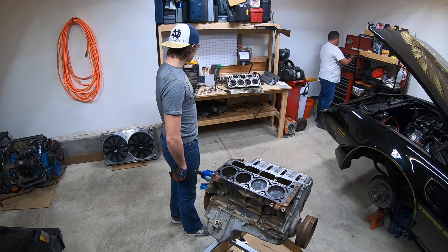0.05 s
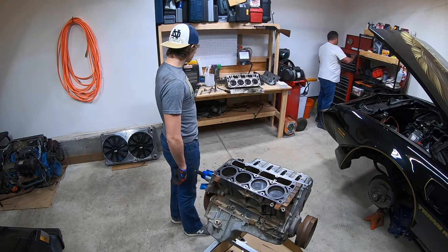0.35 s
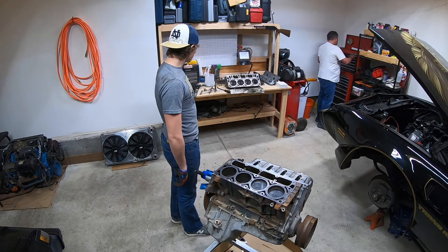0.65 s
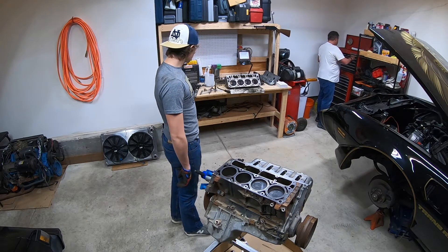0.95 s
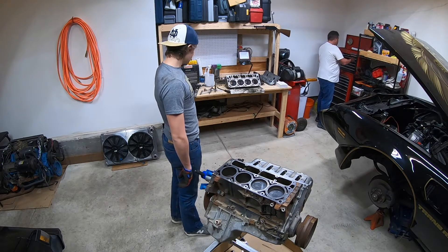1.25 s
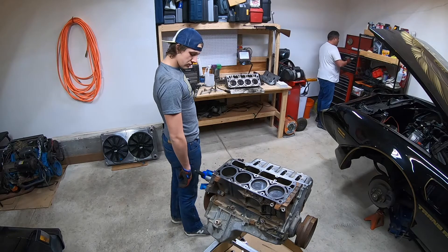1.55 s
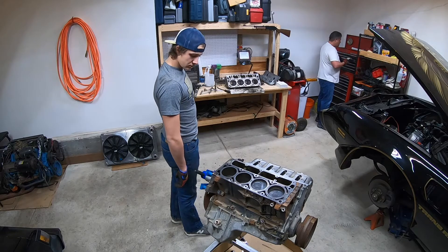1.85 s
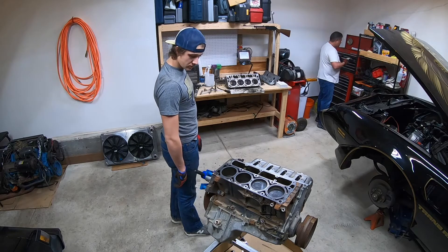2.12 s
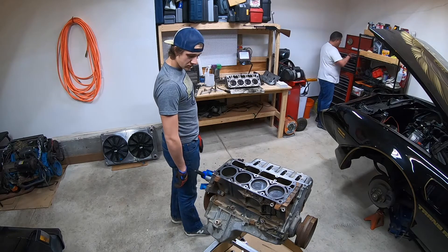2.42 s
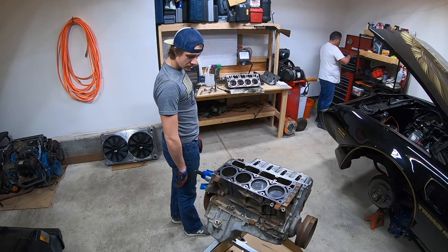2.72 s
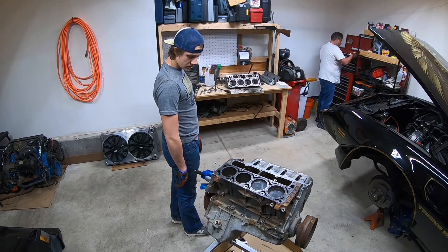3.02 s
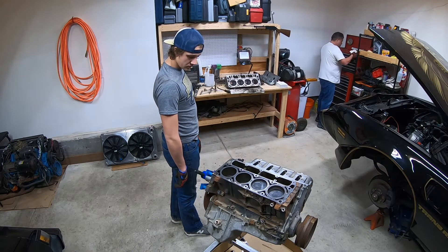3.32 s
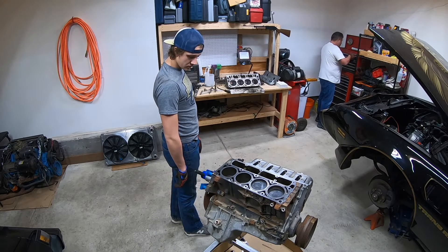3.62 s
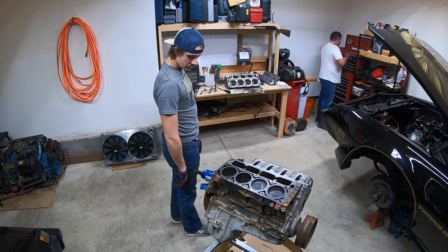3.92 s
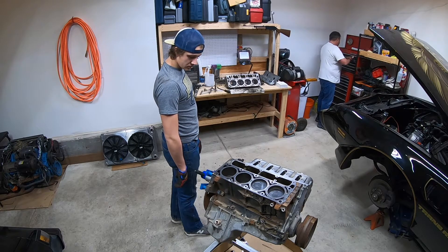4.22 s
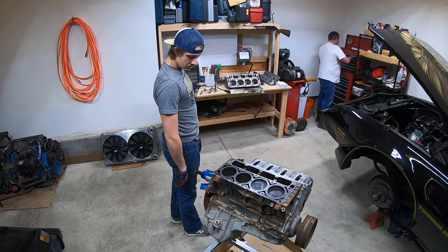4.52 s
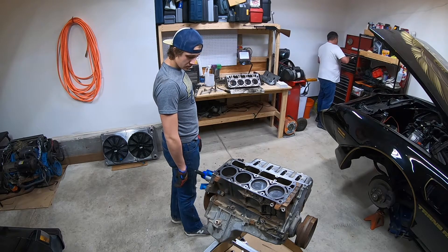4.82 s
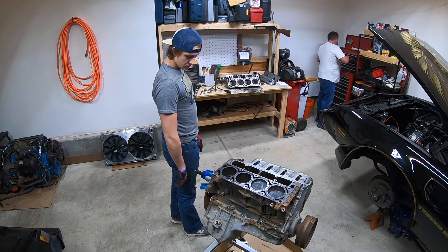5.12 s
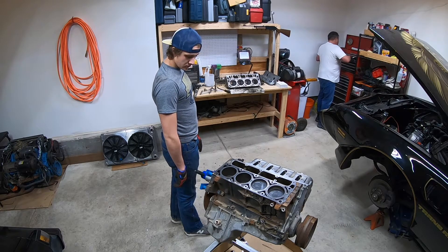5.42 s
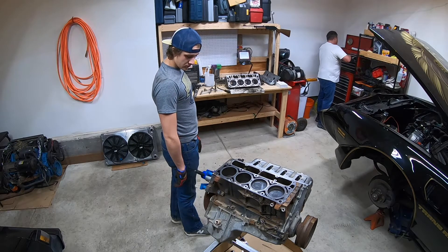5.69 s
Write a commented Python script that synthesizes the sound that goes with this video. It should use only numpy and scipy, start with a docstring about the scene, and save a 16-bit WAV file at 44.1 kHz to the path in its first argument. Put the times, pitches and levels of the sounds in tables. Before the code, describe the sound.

In an echoing garage, steel drawers slide and bang a couple of times before someone rummages through clattering tools.

```python
"""Someone searches a steel tool chest at the far side of a closed, faintly rumbling garage.
A drawer rolls on ticking runners and jolts against its stop; the load clinks and settles back.
Heavy slams, near 0.3 s and 1.6 s, set the air between floor and ceiling booming.
More drawers roll and jolt, and towards the end mostly tools knock as they are picked up and put down.
The bare room smears every knock with its echo."""
import sys
import numpy as np
from scipy import signal
from scipy.fft import rfft, irfft, next_fast_len
from scipy.io import wavfile

SR = 44100
rng = np.random.default_rng(int(sys.argv[2]) if len(sys.argv) > 2 else 0)


def transcribe(u):
    """Save the signal u as a 16-bit wav file named by the first command-line argument.

    u: samples, shape (n,) or (channels, n), limited to [-1, 1]; the rate is SR.
    q: integer samples, one column per channel.
    """
    v = np.clip(np.atleast_2d(u).T, -1, 1)
    q = np.round(v * 32767).astype(np.int16)
    wavfile.write(sys.argv[1], SR, q)


N = 253575
TIME = np.arange(N) / SR


def undb(db):
    """Turn decibels into a number to multiply by."""
    return 10 ** (np.asarray(db) / 20)


def unit(x):
    """Scale a sound so that its total energy is 1."""
    return x / np.sqrt(np.sum(x ** 2))


def fade(t, fade_s):
    """A smooth dying away, 60 dB down after fade_s."""
    return np.exp(-np.log(1000) * t / np.maximum(fade_s, 1e-4))


def along(points, hz):
    """Read a curve drawn through (pitch_hz, value) points, with octaves evenly spaced."""
    pitches, values = np.transpose(points)
    return np.interp(np.log(hz + 1), np.log(pitches), values)


def colour(x, db_at):
    """Turn each pitch up or down by db_at(hz), with no ringing ahead of the sound (minimum phase)."""
    size = 2 * next_fast_len(x.shape[-1] // 2 + 4096)
    cepstrum = irfft(np.log(undb(db_at(np.fft.rfftfreq(size, 1 / SR)))))
    cepstrum[1:size // 2] *= 2
    cepstrum[size // 2 + 1:] = 0
    return irfft(rfft(x, size) * np.exp(rfft(cepstrum)))[..., :x.shape[-1]]


def ring(tones, t):
    """Add up fading pure tones from rows of (pitch_hz, level_db, fade_s)."""
    return sum(undb(db) * np.sin(2 * np.pi * hz * t) * fade(t, fade_s) for hz, db, fade_s in tones)


def place(sounds):
    """Mix (start_s, sound) pairs onto the stereo time line."""
    out = np.zeros((2, 2 * N))
    for start, sound in sounds:
        first = max(int(start * SR), 0)
        out[:, first:first + sound.shape[-1]] += sound
    return out[:, :N]


# how alike left and right are: pitch_hz, likeness (1 = the same)
STEREO_LIKENESS = [(150, 0.95), (320, 0.9), (600, 0.78), (1000, 0.11), (1500, 0.61), (2200, 0.47),
                   (3700, 0.77), (5500, 0.35), (7000, 0.077), (12000, 0.022)]


def surrounding_noise(size):
    """Noise arriving from all sides: left and right are alike in the bass, unrelated at the very top."""
    alike = np.clip(along(STEREO_LIKENESS, np.fft.rfftfreq(size, 1 / SR)), -.99, .998)
    mid, side = rfft(rng.standard_normal((2, size))) * np.sqrt([(1 + alike) / 2, (1 - alike) / 2])
    return irfft([mid + side, mid - side], size)


# tone of the quiet room: pitch_hz, level_db
RUMBLE_TONE = [(25, -24.5), (55, -8.5), (90, -10.5), (125, -1), (200, -3.5), (310, -10), (400, -17.5),
               (500, -26), (780, -14), (1200, -26), (2400, -39.5), (6000, -43), (9400, -45), (14000, -63.5)]


def room_rumble(level_db=-62):
    """The building rumbles faintly all the time."""
    rumble = colour(surrounding_noise(N), lambda hz: along(RUMBLE_TONE, hz))
    return undb(level_db) * np.sqrt(2 * N) * unit(rumble)


# tone of the runners: pitch_hz, level_db
RUNNER_TONE = [(80, -30.5), (200, 0.5), (450, -3.5), (800, 3), (1400, 4), (3200, -2.5), (6000, -10.5),
               (9000, -13.5), (11000, -31), (15000, -40)]
# drawers rolling and tools being pushed about: start_s, stop_s, level_db, speed_up_s
SLIDE_MOVES = [ (-.3, 0.426, -41.5, .1), (1.129, 1.28, -57, .14), (1.254, 1.464, -37.5, 0.09),
               (1.405, 1.75, -30, 0.058), (2.654, 2.905, -52.5, 0.032), (3.707, 3.797, -44.5, 0.029),
               (4.035, 4.35, -42, 0.061), (4.34, 4.83, -48.5, .1), (4.796, 5.7, -51, 0.16),
               (5.188, 5.282, -41, 0.068), ]


def runners(ticks_per_s=1100, spread_db=5, uneven_db=2, uneven_per_s=40, stop_db_per_s=321):
    """Bearings and shifting tools tick as each slide speeds up, holds and stops. Starts 1 s early."""
    t = np.arange(-SR, N) / SR
    ticks = (rng.random(len(t)) < ticks_per_s / SR) * rng.choice([-1, 1], len(t))
    ticks = ticks * undb(spread_db * np.clip(rng.standard_normal(len(t)), -2, 2))
    push = undb(uneven_db * np.interp((t + 1) * uneven_per_s, np.arange(SR), rng.standard_normal(SR)))
    rolling = unit(colour(ticks * push, lambda hz: along(RUNNER_TONE, hz))) * np.sqrt(len(t))
    slides = []
    for start, stop, db, speed_up_s in SLIDE_MOVES:
        speed = np.clip((t - start) / speed_up_s, 0, 1)
        level = undb(db - stop_db_per_s * np.maximum(t - stop, 0))
        slides.append(speed ** 2.6 * level)  # faster is much louder
    return rolling * np.max(slides, axis=0)


# how long the echo lasts: pitch_hz, fade_s
ECHO_FADES = [(60, 0.93), (160, 1), (420, 0.9), (1100, 0.91), (2900, 0.87), (5000, 0.76), (8000, 0.5),
              (13000, 0.51)]


def garage_echo(early_db=5, early_s=.006, early_width_s=0.0078, early_db_per_octave=2.5, build_s=0.0013):
    """Make echo(sound): quick bounces from the corner, then a tail whose high notes die first."""
    t = TIME[:SR]
    band_hz = np.geomspace(60, 15000, 12)
    noise = rfft(surrounding_noise(2 * SR))
    hz = np.fft.rfftfreq(2 * SR, 1 / SR)
    bands = np.array([irfft(noise * along(np.c_[band_hz, share], hz)) for share in np.eye(len(band_hz))])
    tail = fade(t, along(ECHO_FADES, band_hz)[:, None]) * (1 - np.exp(-t / build_s))
    early_gain = undb(early_db + early_db_per_octave * np.log2(band_hz[:, None] / 4000))
    early = early_gain * np.exp(-((t - early_s) / early_width_s) ** 2)
    loudness = np.hypot(tail, early)

    def echo(sound):
        """Every spot in the chest has its own pattern of bounces."""
        spot = rng.integers(SR)
        bounces = np.einsum("bct,bt->ct", bands[..., spot:spot + SR], loudness)  # fade and add the bands
        return signal.fftconvolve(sound[None], np.sqrt(2) * unit(bounces), axes=1)
    return echo


# ringing of the chest's sheet steel: pitch_hz, level_db, fade_s
PANEL_RINGS = [(639, 2.5, 0.27), (967, -0.5, 0.28), (1323, -12, 0.1), (1428, 17, 0.06), (1461, 8, 0.12),
               (1715, 10, 0.44), (2430, -4, .25), (2100, -9, .25), (2220, -8, 0.47), (2480, -11, 0.53),
               (2890, -5, .25), (3210, 17, 0.13), (3860, -11, .3), (3845, 3.5, .2)]
# tone of a knock on steel: pitch_hz, level_db
KNOCK_TONE = [(85, -57), (135, -19.5), (250, -10.5), (480, -8), (670, -3.5), (850, -2), (1250, -2.5),
              (1900, -3.5), (3000, -3.5), (4300, -10), (5600, -12.5), (6600, -17.5), (9000, -17.5),
              (11000, -35), (15000, -49.5)]


def knock(echo, bass_db, hardness_db, peak_hz, peak_db, rattle_s, rattle_db=0):
    """One hard hit and a spray of rebounds; the panels and some loose tools ring briefly."""
    t = TIME[:SR // 4]
    chatter = rng.standard_normal(len(t)) * (rng.random(len(t)) < 900 / SR)  # about 900 a second
    rebounds = unit(chatter * np.exp(-t / max(rattle_s, .003)))
    tools = ring([(hz, 3 * rng.standard_normal(), 0.18) for hz in rng.uniform(1500, 11000, size=30)], t)
    panels = ring([(hz, db + 3 * rng.standard_normal(), fade_s) for hz, db, fade_s in PANEL_RINGS], t)
    shaken = undb(rattle_db) * rebounds + undb(-15) * unit(tools) + undb(-17) * unit(panels)
    blow = (echo(signal.unit_impulse(len(t))) + echo(shaken)) / np.hypot(1, undb(rattle_db))
    # heavy drawers add bass; hard metal on metal adds bite and sparkle
    tilt = [(200, bass_db), (600, 0.01), (1400, 0.009), (3300, 0.53 * hardness_db - 2),
            (8000, hardness_db)]

    def tone_db(hz):
        """The struck part favours one broad range of pitches around peak_hz."""
        octaves_away = np.log2((hz + 1) / peak_hz)
        return along(KNOCK_TONE, hz) + along(tilt, hz) + peak_db * np.exp(-(octaves_away / 0.33) ** 2)
    return colour(blow, tone_db)


# notes of the loose tools: pitch_hz, level_db
TOOL_NOTES = [(730, 1.5), (816, 0), (1060, 2), (1256, -1), (1350, 6.5), (1450, -9), (1773, 2.5), (1935, -2),
              (2073, 0), (2650, -8.5), (3130, -4), (3620, -1), (5690, 0.5), (5925, 1)]


def clink(echo, struck_hz, fade_s=0.06, contact_s=0.0018, drop_db_per_octave=13.5):
    """Tools ring most near the struck pitch, swelling during the hit until the drawer muffles them."""
    t = TIME[:SR // 4]
    tones = [(hz, db - drop_db_per_octave * abs(np.log2(hz / struck_hz)), fade_s)
             for hz, db in TOOL_NOTES]
    swell = 1 - np.exp(-(t / contact_s) ** 2)
    return echo(unit(ring(tones, t) * swell))


# drawers hitting their catches and stops (clink and settle levels are added to level_db):
# start_s, level_db, bass_db, hardness_db, peak_hz, peak_db, rattle_s, clink_db, settle_db
DRAWER_JOLTS = [ (.048, 25, 3, 4, 5450, 5, 0.021, -45, -11), (.291, 19, 11.5, 1, 680, 5.5, .053, -31, -14),
                (1.277, -3.5, 12.5, -14, 3200, 7.5, .022, -25, -4),
                (1.331, .5, 6, -8.5, 735, 13.5, .025, -23.5, -2.5),
                (1.443, 22, -2, 6.5, 5900, 5.5, 0.035, -20.5, -24),
                (1.605, 23, 6, 7.5, 3670, 7.5, .034, -14.5, -9.5),
                (1.922, 19.5, 7.5, 5, 2268, 5, 0.0036, -17, -8),
                (2.779, 2.5, -6, 6, 1060, 4, 0.021, -16, -2.5),
                (3.732, 4, 11.5, -15.5, 1670, 5, .015, -30, -10),
                (4.083, 15.5, 2, -7.5, 800, 0, 0.046, -26.5, -13.5),
                (4.418, 1.5, 17, 12.5, 5330, 2.5, .011, -28, -12), ]


def drawer_jolts(echo, settle_after_rattles=2.8, settle_bass_db=7):
    """Each jolt knocks the steel and clinks the tools; the load settles back with a deeper knock."""
    for start, db, bass_db, hardness_db, hz, peak_db, rattle_s, clink_db, settle_db in DRAWER_JOLTS:
        shape = hardness_db, hz, peak_db, rattle_s
        yield start, undb(db) * (knock(echo, bass_db, *shape) + undb(clink_db) * clink(echo, hz))
        settling = knock(echo, bass_db + settle_bass_db, *shape, rattle_db=0.5)
        yield start + settle_after_rattles * rattle_s, undb(db + settle_db) * settling


# tools knocking on each other and on the drawer:
# start_s, level_db, hardness_db, peak_hz, peak_db, rattle_s, clink_db
TOOL_HITS = [ (0.249, -10, -33, 1370, 30, 0.0036, -20), (1.585, 15.5, 4, 2850, -3, .02, -33),
             (1.649, 18.5, 3, 2085, 7, 0.018, -22), (3.036, -2.5, -14.5, 1260, 6, 0.0026, -16),
             (3.811, 1.5, 15.5, 1740, 2.5, 0.015, -13.5), (4.302, 4, -0.5, 1100, 10.5, 0.008, -14),
             (4.367, -14, 21, 1230, -3, 0.015, -30), (4.55, 0, -3.5, 1700, 11.5, 0.02, -27),
             (4.614, 10.5, -6.5, 1635, 11.5, 0.001, -9), (4.845, 4, -7.5, 1660, 8.5, 0.013, -15.5),
             (5.046, 2, -10, 1480, 5, 0.0037, -34), (5.097, 2.5, 3, 1260, 1, 0.02, -15),
             (5.191, -5, 0, 5400, 12.5, 0.0052, -20), (5.29, 18.5, 3, 1240, 4.5, 0.0094, -14.5),
             (5.591, 1, -10, 1363, 5, 0.023, -28), (5.73, 1, 1.5, 830, 18, .005, -25), ]


def handled_tools(echo, usual_rattle_s=0.0098, bass_db_per_doubling=8.5):
    """Tools knock and clink as they are moved; a longer rattle shakes the drawer more, adding bass."""
    for start, db, hardness_db, hz, peak_db, rattle_s, clink_db in TOOL_HITS:
        bass_db = bass_db_per_doubling * np.log2(rattle_s / usual_rattle_s)
        hit = knock(echo, bass_db, hardness_db, hz, peak_db, rattle_s)
        yield start, undb(db) * (hit + undb(clink_db) * clink(echo, hz))


# tone of the cabinet's thud: pitch_hz, level_db
THUD_TONE = [(30, -12), (55, -8.5), (85, -2.5), (140, 2), (260, 3), (380, -16), (900, -21), (4000, -67)]
# notes of the air between floor and ceiling: pitch_hz, level_db, fade_s
BOOM_NOTES = [(56.4, -8, 0.76), (117.2, -4.5, 0.64), (162.3, -5, 0.86), (208, -5, 0.69), (304.5, -2.5, 1)]
# drawers hitting home and rocking the cabinet: start_s, level_db, pitch_hz
DRAWER_SLAMS = [(0.306, -24.5, 114), (0.344, -44.5, 200), (.46, -40.5, 168.5), (1.607, -23.5, 70),
                (1.625, -31, 190), (1.931, -33, 190)]


def slams(echo, swell_s=0.0068, drop_db_per_octave=7, thud_db=44, thud_s=0.016):
    """The cabinet thuds and stirs the room's notes nearest its own pitch; they take a moment to build."""
    t = TIME[:SR]
    swell = 1 - np.exp(-(t / swell_s) ** 2)
    for start, level_db, slam_hz in DRAWER_SLAMS:
        shudder = unit(rng.standard_normal(SR) * t * np.exp(-t / thud_s))
        thud = echo(colour(shudder, lambda hz: along(THUD_TONE, hz)))[:, :SR]
        tones = []
        for hz, db, fade_s in BOOM_NOTES:
            drop_db = drop_db_per_octave * abs(np.log2(hz / slam_hz))
            tones.append((hz * (1 + 0.015 * rng.standard_normal()), db - drop_db, fade_s))
        yield start, undb(level_db) * (ring(tones, t) * swell + undb(thud_db) * thud)


def scene(lean_right_db=0.24):
    """The chest heard across the garage, slightly to the right."""
    echo = garage_echo()
    booms = place(slams(echo))
    knocks = place(drawer_jolts(echo)) + place(handled_tools(echo))
    rolling = echo(runners())[:, SR:SR + N]  # skip the early second
    balance = undb([[-lean_right_db], [lean_right_db]])
    return (knocks + rolling) * balance + booms + room_rumble()


def record(dry, low_cut_hz=33, high_cut_hz=15200):
    """Thin the deepest bass and steeply cut the very highest pitches."""
    thinned = signal.sosfilt(signal.butter(2, low_cut_hz, "high", fs=SR, output="sos"), dry)
    return signal.sosfilt(signal.ellip(8, .2, 70, high_cut_hz, fs=SR, output="sos"), thinned)


dry = scene()
out = record(dry)
transcribe(out)
```